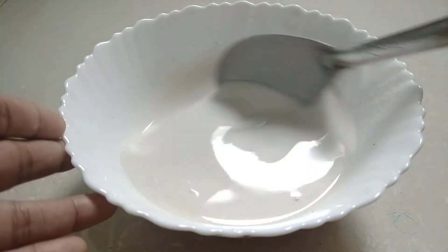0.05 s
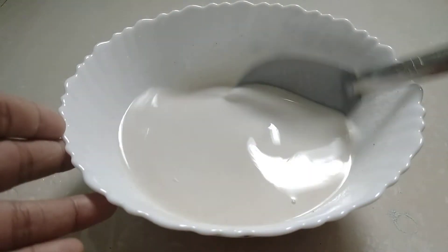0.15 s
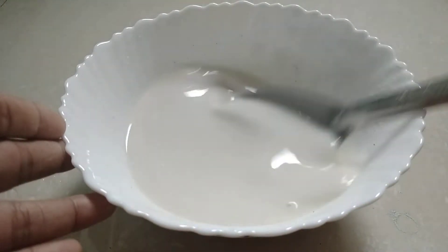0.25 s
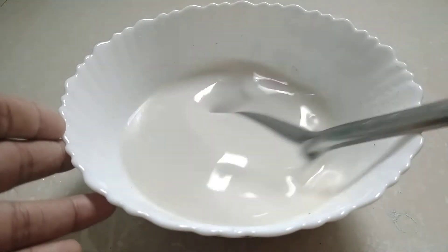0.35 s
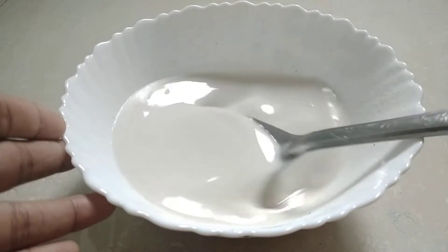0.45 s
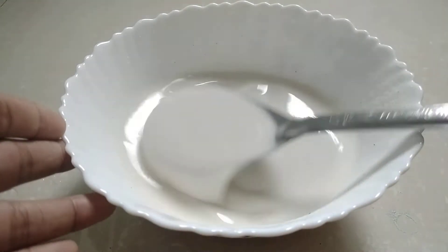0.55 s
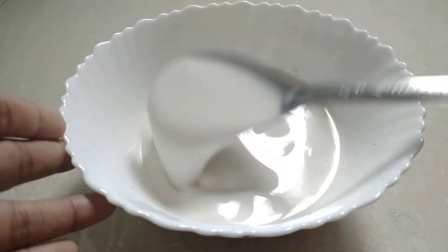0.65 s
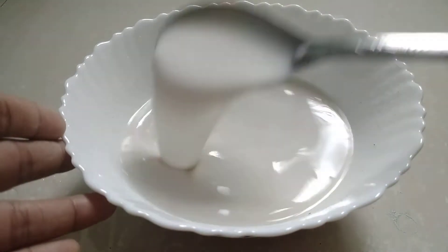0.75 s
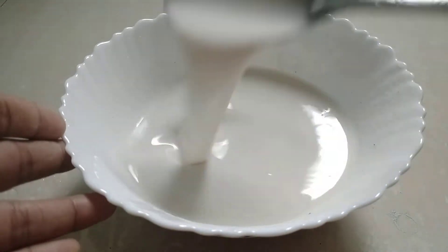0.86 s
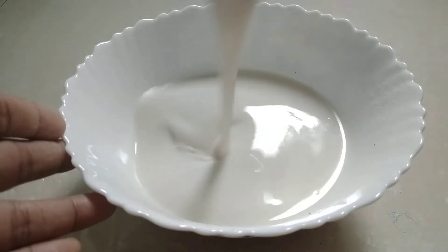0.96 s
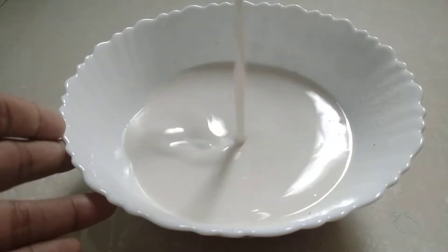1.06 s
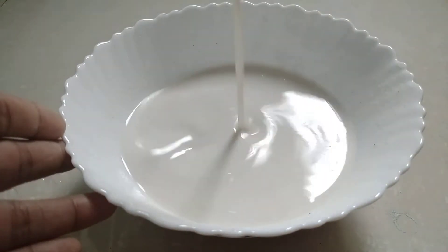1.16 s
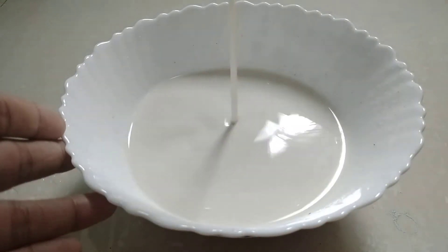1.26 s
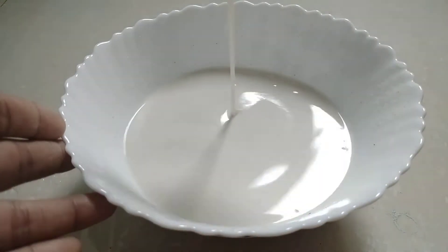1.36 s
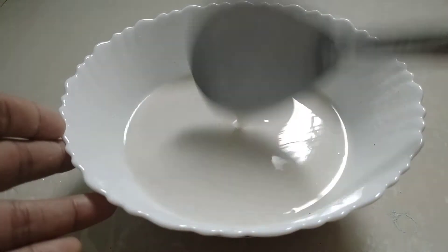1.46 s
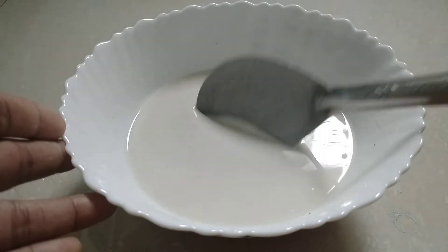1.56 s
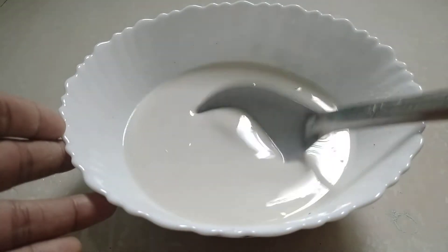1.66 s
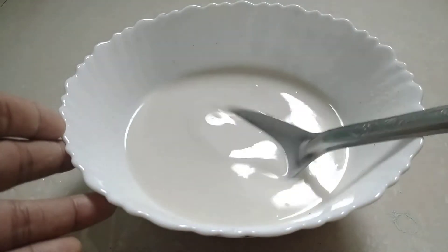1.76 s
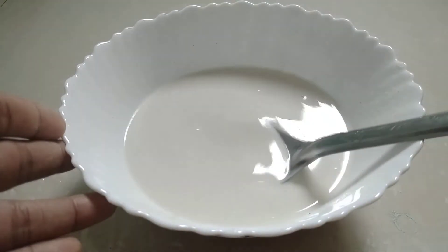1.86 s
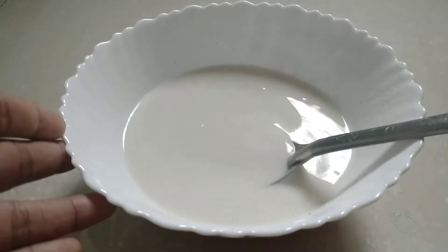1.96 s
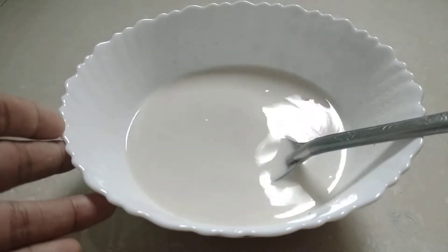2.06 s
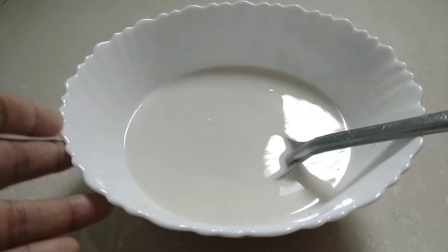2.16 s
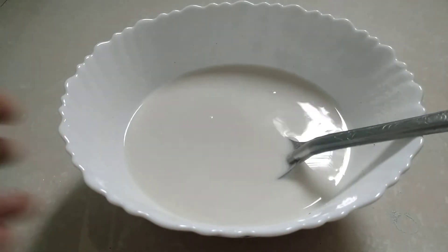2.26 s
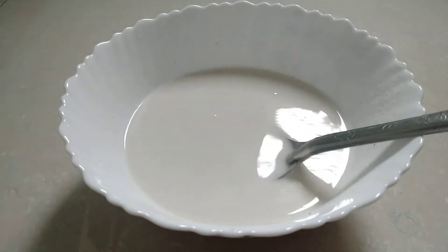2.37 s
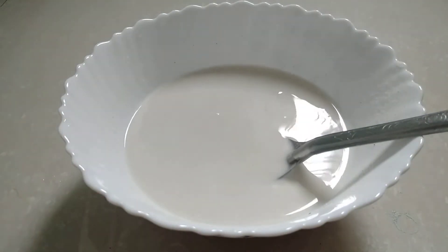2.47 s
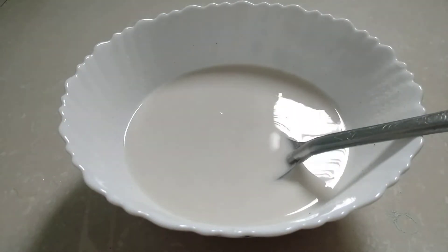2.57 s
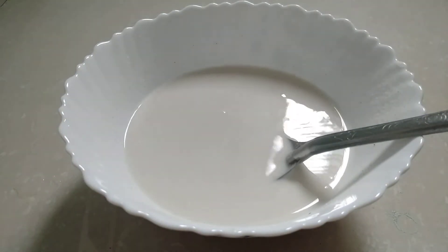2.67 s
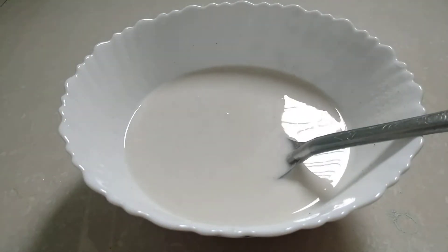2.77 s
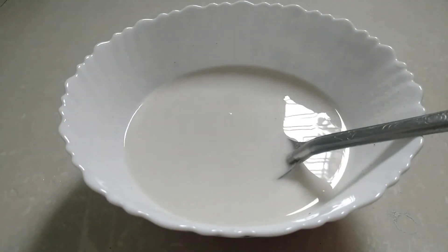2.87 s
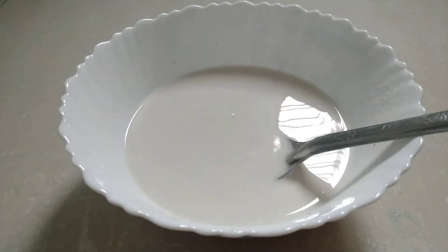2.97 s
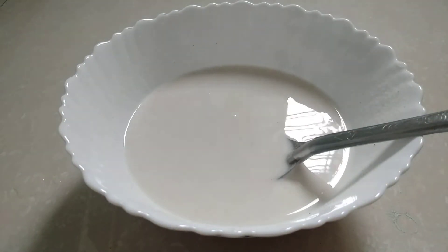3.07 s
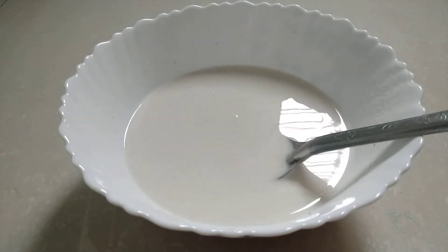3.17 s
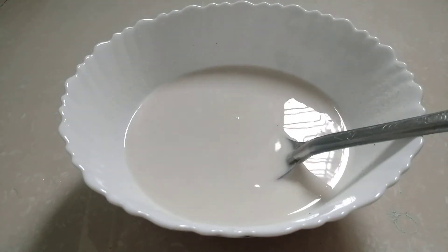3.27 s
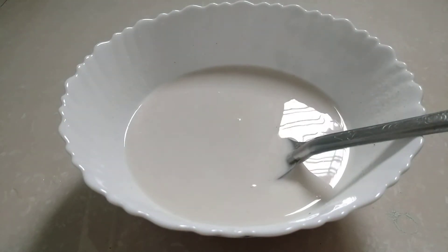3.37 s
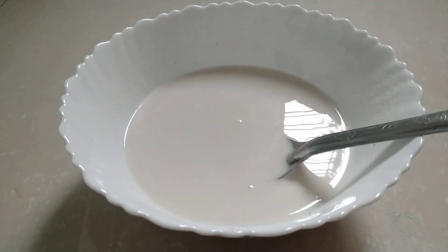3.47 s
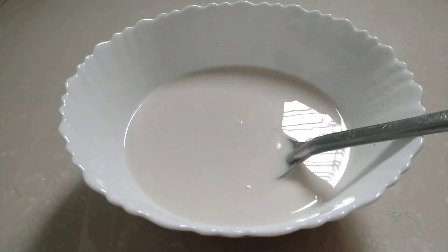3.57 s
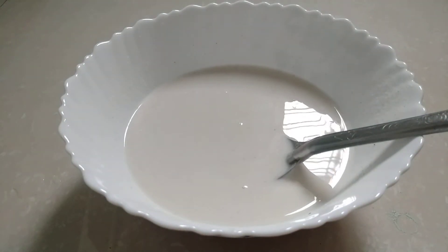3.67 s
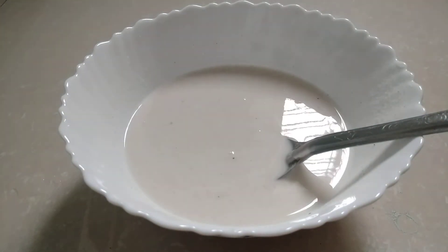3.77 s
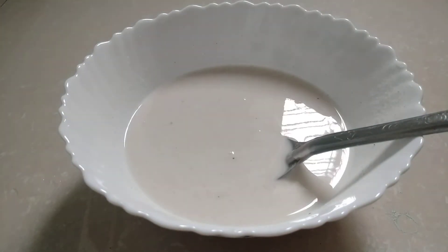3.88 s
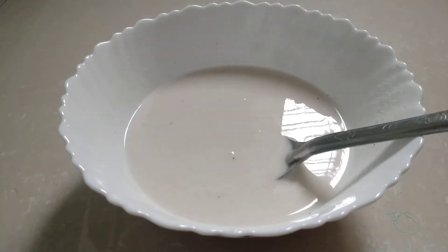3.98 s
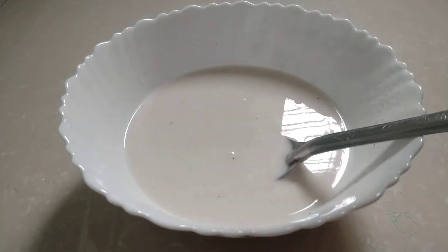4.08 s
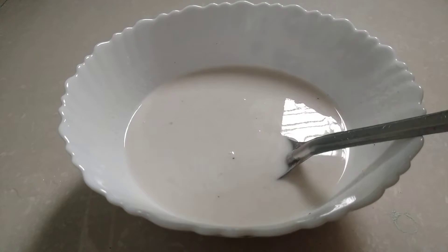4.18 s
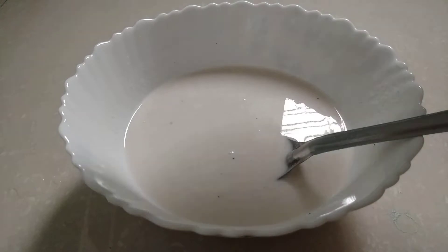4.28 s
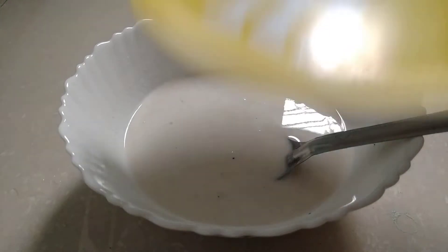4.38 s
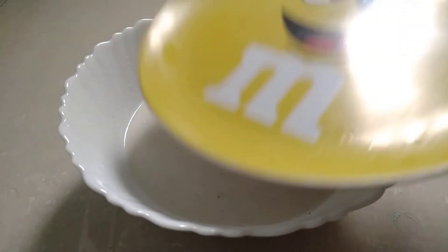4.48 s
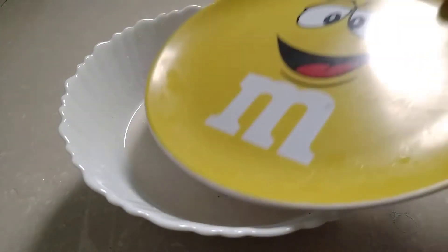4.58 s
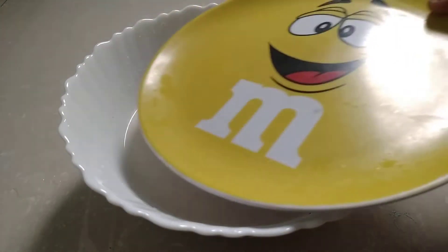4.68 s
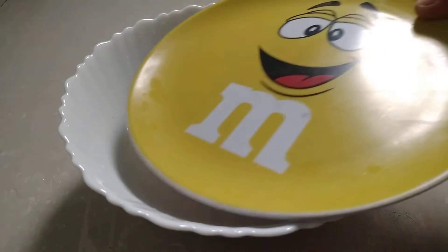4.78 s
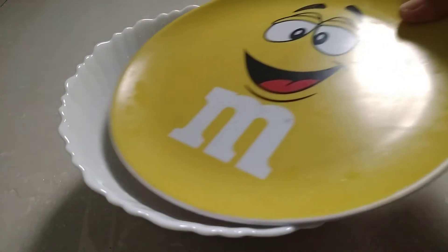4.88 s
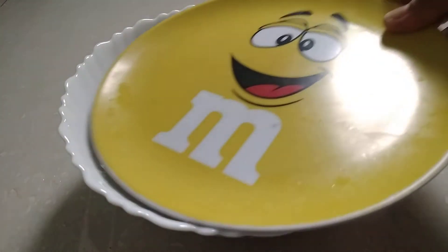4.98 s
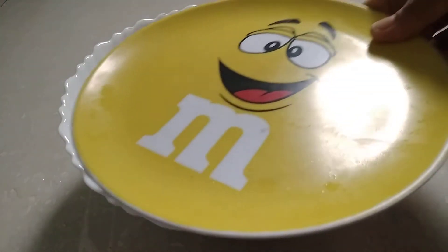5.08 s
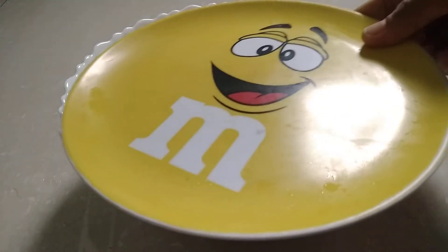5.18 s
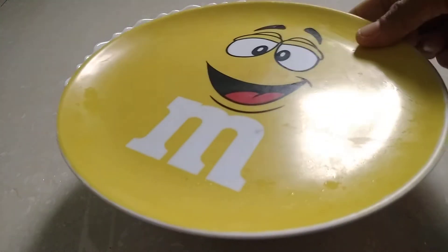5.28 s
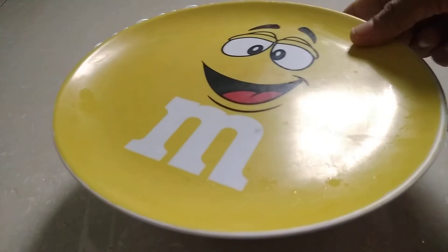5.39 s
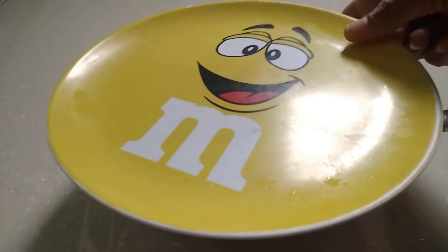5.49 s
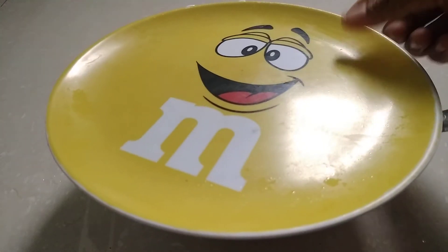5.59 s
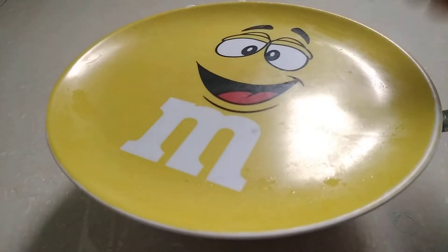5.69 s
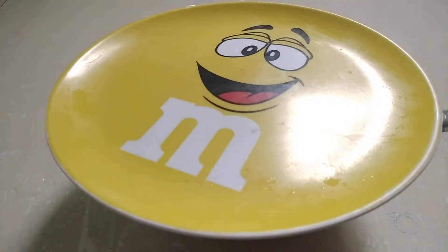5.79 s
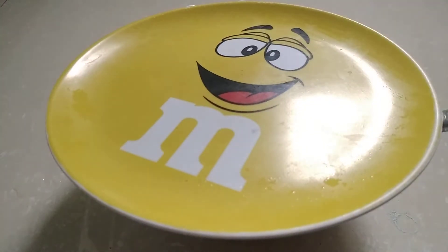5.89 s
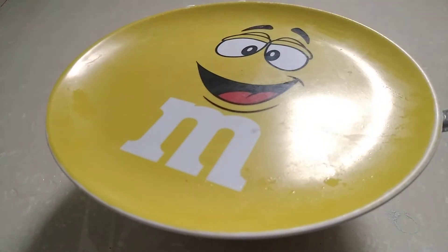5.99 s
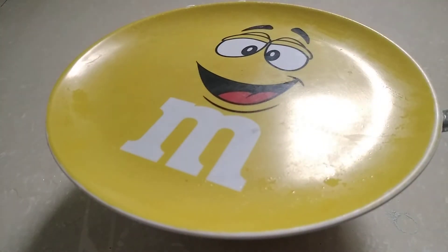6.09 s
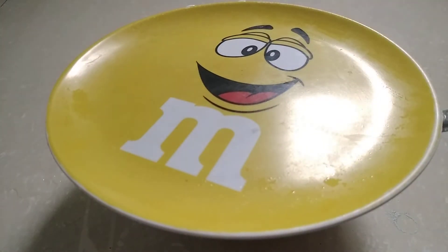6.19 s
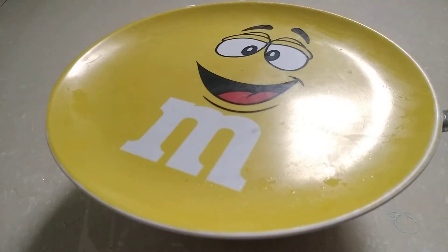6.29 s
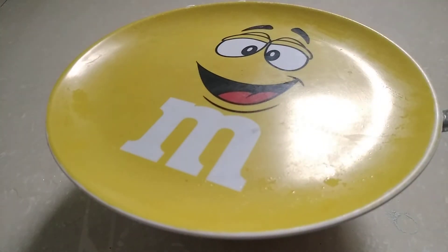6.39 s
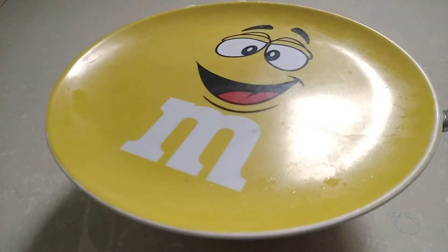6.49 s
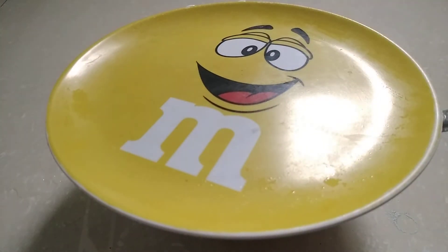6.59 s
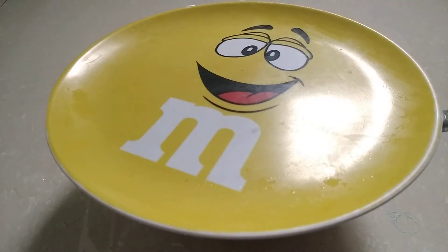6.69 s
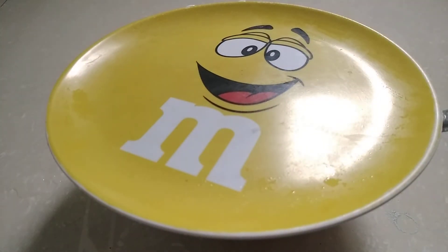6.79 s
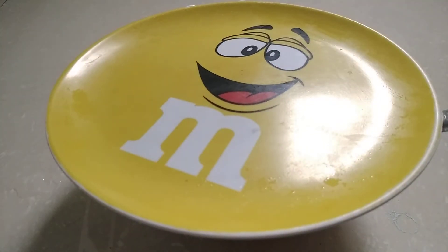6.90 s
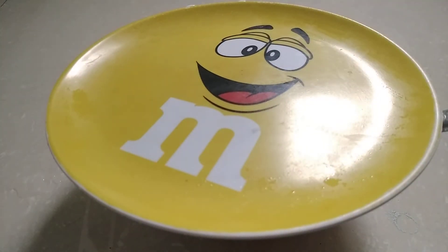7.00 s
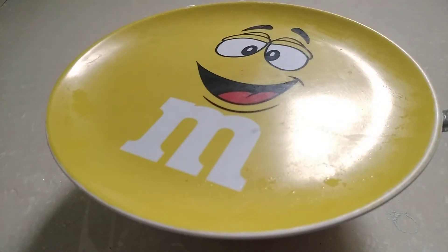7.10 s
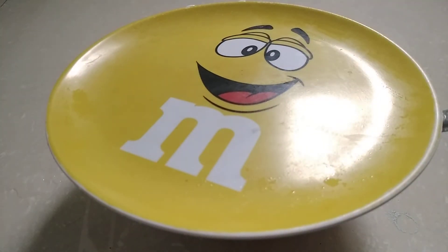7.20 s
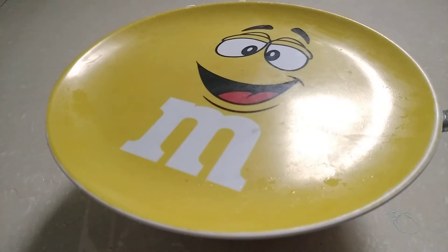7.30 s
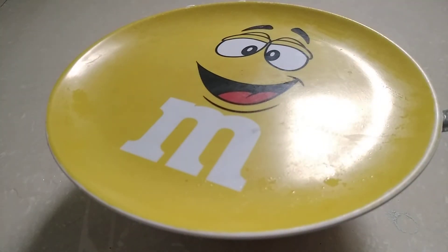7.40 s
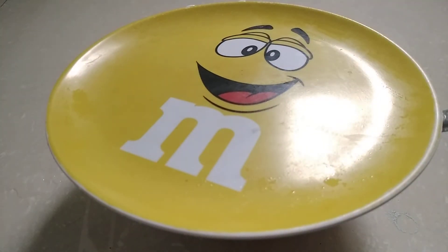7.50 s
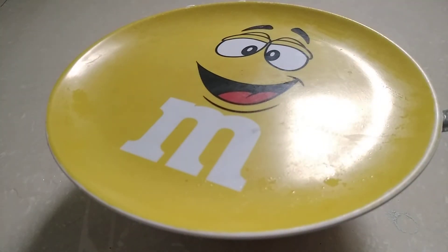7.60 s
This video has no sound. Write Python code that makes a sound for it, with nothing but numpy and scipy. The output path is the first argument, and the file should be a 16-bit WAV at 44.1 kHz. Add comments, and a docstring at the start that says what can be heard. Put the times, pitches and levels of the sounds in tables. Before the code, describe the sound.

For the first 0.4 seconds a steel spoon knocks and scrapes against a glass bowl of batter, with short, damped clinks. Two dry taps sound nearby at about 0.9 and 1.2 seconds. From 1.8 to 2.2 seconds the spoon is laid down in the bowl with a clink, a quick rattle and a light scrape. Bangles click sharply at 2.8 seconds and jingle until about 3.1, then tick again around 4.1. At 4.65 seconds a plastic plate lands on the rim with a loud, hollow knock. It slides across, rubbing and clattering, with a brief low thrum around 5.1 as the bowl drags on the counter, and rocks to rest by 5.6. Faint bangle ticks and a soft sleeve rustle follow until 6.4. Everything is close, in a quiet kitchen whose low hum and hiss continue to the end, near 7.6 seconds.

```python
"""A steel spoon knocks and scrapes a glass bowl of thin batter and is laid down. Dry taps sound nearby,
bangles tick on two moving wrists, and a plastic plate slides over the bowl as a lid and rocks to rest.
Each impact is a crack followed by the damped modes of the struck body; friction drives those modes
with noise. A quiet kitchen hums and hisses around a two-port microphone whose right port hears
little bass."""
import sys
import numpy as np
from scipy.fft import rfft, irfft, next_fast_len
from scipy.io import wavfile
from scipy.ndimage import map_coordinates

SR = 44100
rng = np.random.default_rng(int(sys.argv[2]) if len(sys.argv) > 2 else 0)


def wrap_up_sound(samples):
    """Save the sound to the file named by the first command line argument, as 16-bit audio."""
    columns = np.atleast_2d(samples).T
    # keep every value between -1 and 1, then stretch to whole-number steps
    tamed = np.clip(columns, -1, 1)
    steps = np.round(tamed * 32767).astype(np.int16)
    wavfile.write(sys.argv[1], SR, steps)


N = 337365
TIME, AGE = np.arange(N) / SR, np.arange(SR // 4) / SR  # seconds into the scene, into one impact

# Modes of the bowl and of the plate. Each row: frequency in Hz, level in dB, T60 in seconds.
BOWL_MODES = [(545, -17, 0.093), (625, -15.5, 0.17), (799.4, -10, 0.052), (876, -13.5, 0.16),
              (934, -14.5, 0.16), (1340, -13.5, 0.22), (1626, -4.5, 0.06), (1791, -14.5, 0.24),
              (2116, -13.5, 0.15), (2390, -6, 0.071), (2620, 4, 0.042), (2820, -2.5, 0.066),
              (2920, -1, 0.02), (3530, 1, 0.051), (3870, 3, 0.093), (4000, 9, 0.029), (4330, 2, 0.094),
              (4670, 8, 0.059), (5190, -1, 0.042), (5530, 0, .05), (5800, -4, 0.07), (6030, 0, 0.046),
              (6470, 3.5, 0.046), (7600, -2, 0.059), (7990, 1, 0.04), (8720, 5.5, 0.028),
              (9540, -6.5, 0.02), (9710, 9.5, 0.035), (10400, -5, .05), (11200, 2.5, 0.12),
              (12000, 2, 0.056), (12260, -15, 0.037), (13457, -18, .04)]
PLATE_MODES = [(337, -6.5, 0.15), (532, -4.5, 0.1), (587, -1.5, 0.1), (638, 3.5, 0.07), (714, -2, 0.031),
               (794, -5.5, 0.06), (881.5, -1, 0.12), (1040, -10, 0.13), (1166, 3.5, 0.11), (1382, -7, 0.1),
               (1483, -7.5, 0.17), (1585, -8, 0.14), (1681, -6, 0.15), (2125, -6, 0.13), (2378, -2, 0.16),
               (3225, -2, .12), (3536, 3, 0.12), (3688, 1, 0.12), (1891, -7, 0.061), (2010, -4.5, 0.087),
               (2600, -8, 0.019), (2980, -7, 0.06), (3800, 4, 0.035), (4290, 10.5, 0.055),
               (4450, -4, 0.062), (4560, 8, 0.048), (5210, -8, 0.11), (5500, -4, 0.027), (5700, -5, 0.07),
               (6570, 4, 0.045), (7270, -11, 0.064), (7470, 7, 0.022), (8880, 5.5, 0.099), (9620, 0, 0.074),
               (12220, -10, 0.045)]
# Likeness of diffuse sound at the two ports. Each row: frequency in Hz, correlation.
DIFFUSE = [(60, 1), (240, 0.55), (950, -0.025), (3770, 0.018), (15000, -0.059)]


def amp(db):
    """Amplitude ratio of a level in decibels."""
    return 10 ** (np.asarray(db) / 20)


def along(points, hz):
    """Interpolation of (Hz, value) points on a logarithmic frequency axis."""
    knots_hz, values = np.transpose(points)
    return np.interp(np.log(hz + 1), np.log(knots_hz + 1), values)


def wobble(rate):
    """Smooth random modulation with `rate` knots a second."""
    return map_coordinates(rng.standard_normal(int(N * rate / SR) + 4), [TIME * rate])


def swells(rows, rise_db_per_s):
    """Exponential rise, hold and decay. Each row: start and end in seconds, level in dB, fade in dB/s."""
    return sum(amp(db - rise_db_per_s * np.maximum(start - TIME, 0) - fade * np.maximum(TIME - end, 0))
               for start, end, db, fade in rows)


def filtered(x, response):
    """Linear filtering: the spectrum is multiplied by a frequency response."""
    size = next_fast_len(x.shape[-1] + 8192)
    return irfft(rfft(x, size) * response(np.fft.rfftfreq(size, 1 / SR)), size)[..., :x.shape[-1]]


def stereo_noise(spectrum, correlation=DIFFUSE):
    """Partly coherent noise: the sum and difference of a mid signal of unit rms and a side signal."""
    def shape(hz):
        angle = np.arccos(np.clip(along(correlation, hz), -1, 1)) / 2
        return amp(along(spectrum, hz)) * [np.cos(angle), np.sin(angle)]
    mid, side = filtered(rng.standard_normal((2, N)), shape)
    return np.array([mid + side, mid - side]) / np.std(mid)


def resonance(modes, blur, floor):
    """Superposition of resonators, each blur / T60 hertz wide, over a flat floor."""
    return lambda f: floor + sum(amp(db) * 1j * f * blur / t60 / (hz * hz - f * f + 1j * f * blur / t60)
                                 for hz, db, t60 in modes)


def friction(spectrum, modes, blur, grit_db, surge_db=2):
    """Forced vibration: noise with fast grit and slower surges drives a body's modes."""
    roughness = amp(grit_db * wobble(280) + surge_db * wobble(45))
    force = roughness * stereo_noise(spectrum, [(600, 1.0), (1500, 0.12)])
    sound = filtered(force, resonance(modes, blur, floor=0.1))
    return 1.4 * sound / np.sqrt(np.mean(sound ** 2) + 1e-20)


def ring(modes, stretch, lag_s):
    """Free vibration: damped, slightly unsteady sines that reach the left port lag_s later."""
    t = np.clip(AGE - np.array([[lag_s], [0]]), 0, 1)
    drift = 2e-6 * np.cumsum(rng.standard_normal(len(AGE)))
    out = 0
    for hz, db, t60 in modes:
        left_phase = rng.normal(0, min(hz / 3000, 1)) * np.array([[1], [0]])
        onset = 1 - np.exp(-t * hz / 0.57)  # a mode needs about a cycle to build up
        decay = amp(db + rng.normal(0, 2) - 60 * t / (t60 * stretch))
        out = out + onset * decay * np.sin(hz * (2 * np.pi * t + drift) + left_phase)
    return out


def burst(band, stretch, room_db, lag_samples, modes=()):
    """A coherent crack of band noise, then incoherent reverberation coloured by the modes."""
    low, high, crack_t60, room_t60 = band[:4]
    colour = resonance(modes, blur=4, floor=band[-1])

    def shape(hz):
        tint = (np.ones_like(hz) * colour(hz)) ** np.array([[0], [1], [1]])  # the crack stays flat
        return tint / (1 + (low / (hz + 1)) ** 6) / (1 + (hz / high) ** 6)
    noise = filtered(rng.standard_normal((3, len(AGE))), shape)
    noise /= noise.std(axis=1, keepdims=True)
    crack = noise[0] * amp(-60 * AGE / (crack_t60 * stretch)) * (1 - np.exp(-AGE / (0.091 * crack_t60)))
    room = noise[1:] * amp(room_db - 60 * AGE / room_t60) * (1 - np.exp(-AGE / 0.00027))
    return np.array([np.roll(crack, lag_samples), crack]) + room


def snap(width_s, lag_s, count):
    """Contact transient: `count` pressure spikes, spaced as quick, uneven rebounds."""
    gap_draw, level_draw = rng.standard_normal((2, 4))
    gaps_s = 0.0015 * amp(3 * gap_draw)
    starts = np.cumsum(gaps_s) - gaps_s[0]
    out = 0
    for k in range(count):
        u = np.clip(AGE - starts[k] - np.array([[lag_s], [0]]), 0, 1) / width_s
        out = out + amp(2 * level_draw[k] + k) * np.e * u * (2 - u) * np.exp(-u)
    return out


def add(out, sound, start_s, pan_db):
    """Panning by level difference: mixes a sound in with the left pan_db above the right."""
    i = round(start_s * SR)
    out[:, i:i + len(AGE)] += sound * amp([[pan_db / 2], [-pan_db / 2]])


def impacts(events, modes, ring_db, crack_db, room_db, snap_db, snap_s, favour_db, lean_db, pan, lag):
    """Impulse excitation: each contact cracks and rings the modes, most those its position favours."""
    # Each event: start in seconds, level in dB, body and edge in dB over it, three favoured
    # frequencies in Hz, decay time factor. The lag of the left port is in samples.
    # Bands of an impact. Each row: low and high limit in Hz, crack and room T60 in seconds,
    # share of favour_db, ringing in dB, flat part of the room's response.
    bands = [(450, 1100, .012, .27, 1, 0, .08), (1100, 3200, .012, .3, .8, 0, .15),
             (3200, 7000, .011, .24, .55, -6, .22), (7000, 13500, .012, .2, .5, -7, .35)]
    hard_db, clang_db_per_db = -34, 0.13  # harder blows ring their treble modes more
    out = np.zeros((2, N + SR))
    for start, db, body, edge, *favoured_hz, stretch in events:
        pan_db = np.interp(start, *np.transpose(pan))
        stretch = np.clip(stretch, 0.2, 4)
        for band, offset_db in zip(bands, (body, 0, edge + lean_db, edge - lean_db)):
            low, high, _, _, share, band_ring_db, _ = band
            in_band = [m for m in modes if (low <= m[0] or band is bands[0]) and m[0] < high]
            excited = []
            for hz, level, t60 in in_band:
                nearness = max(np.exp(-(np.log(hz / np.array(favoured_hz)) / 0.041) ** 2))
                detune = rng.normal(1, 0.003)  # the grip changes
                excited.append((hz * detune, level + share * favour_db * nearness, t60))
            clang_db = (low > 3000) * clang_db_per_db * (db + offset_db - hard_db)
            ringing = amp(ring_db + band_ring_db + clang_db) * ring(excited, stretch, lag / SR)
            crack = amp(crack_db) * burst(band, stretch, room_db, lag, excited)
            add(out, amp(db + offset_db) * (ringing + crack), start, pan_db)
        add(out, amp(db + edge / 2 + snap_db) * snap(snap_s, lag / SR, count=4), start, pan_db)
    return out[:, :N]


def noise_floor():
    """Broadband noise: room rumble and microphone hiss, each wavering slightly in level."""
    # Spectra of the two. Each row: frequency in Hz, relative density in dB.
    rumble_spectrum = [(15, -48), (25, -69.5), (38, -3.5), (124, -3), (151, 1.5), (320, -2), (425, -5),
                       (494, -5), (900, -11.5), (1170, -32.5), (1980, -120)]
    hiss_spectrum = [(290, -54.5), (500, -8), (655, -16), (811, -15.5), (935, -2), (1410, -5.5), (2290, -5),
                     (2680, -6), (3410, -6), (5010, -11), (5460, -15.5), (7790, -9), (8990, 3),
                     (11200, -14.5), (13900, -14.5), (15000, -29)]
    rumble = amp(-67.5 + 1.1 * wobble(6) + 0.7 * wobble(1)) * stereo_noise(rumble_spectrum)
    hiss = amp(-66.5 + 0.3 * wobble(8) + 0.5 * wobble(1)) * stereo_noise(hiss_spectrum)
    return rumble + hiss


def far_hums():
    """Low tones, modulated in amplitude and frequency, come and go like far engines."""
    # Each row: start and end in seconds, first and last frequency in Hz, relative level in dB.
    hums = [(0, 0.873, 89.4, 90.4, -71.5), (1.05, 1.417, 92.6, 91, -73), (1.083, 1.82, 135, 136.8, -74),
            (6.116, 7.245, 73.9, 89.8, -73.5), (7.046, 7.205, 282, 282, -67),
            (7.33, 7.651, 277, 285, -71.5)]
    out = 0
    for start, end, first_hz, last_hz, db in hums:
        envelope = swells([(start, end, db, 300)], 300) * amp(3 + 4 * wobble(8))
        hz = np.interp(TIME, [start, end], [first_hz, last_hz]) + 3.07 * wobble(23)
        out = out + envelope * np.sin(2 * np.pi * np.cumsum(hz) / SR)
    return out


def whine(start_s=4):
    """Closely spaced tones near 10 kHz beat inside a narrow band of hiss."""
    # The tones and the hiss spectrum. Each row: frequency in Hz, relative level in dB.
    partials = [(9905, -84), (10002, -84), (10104, -80), (10201, -88)]
    fizz_spectrum = [(9600, -40), (9800, 0), (10250, 0), (10450, -40)]
    tones = sum(amp(db + 3 + 2 * wobble(6))
                * np.sin(2 * np.pi * hz * TIME + [[0], [1.5]] + 0.6 * wobble(30)) for hz, db in partials)
    return (TIME > start_s) * (tones + amp(-72.5) * stereo_noise(fizz_spectrum))


def sleeve():
    """Friction of moving cloth gives swells of broadband noise."""
    # Each row: start and end in seconds, level in dB, fade in dB/s.
    moves = [(5.96, 6.0, -57, 65), (7.4, 7.65, -69.5, 90)]
    # Each row: frequency in Hz, relative density in dB.
    spectrum = [(240, -17), (400, 8), (677, -5), (787, 4.5), (1470, -2), (2040, 4), (5000, -4.5),
                (8000, -8.5), (10400, -4), (13500, -10), (17600, -120)]
    return swells(moves, 70) * amp(0.75 * wobble(36)) * stereo_noise(spectrum)


def board_taps():
    """Dry taps nearby: impacts excite the well-damped modes of a board."""
    # Each row is one tap, with the columns of an event in impacts().
    taps = [(0.595, -73.5, -7, 23, 620, 2170, 8700, 1), (0.826, -61, -27, -10, 950, 2480, 8700, 0.98),
            (0.865, -68.5, -18, 18, 956, 2110, 8700, 0.63),
            (0.936, -33, -16.5, 3.5, 2060, 2480, 12500, 0.78), (1.1757, -37, -8, 7, 1530, 2210, 4460, 0.85),
            (5.845, -57, -4.5, -12, 1500, 2200, 940, 0.28)]
    # Each row: frequency in Hz, level in dB, T60 in seconds.
    board_modes = [(940, 4.5, 0.17), (981, 9.5, 0.12), (1340, -48, 0.037), (1590, -4.5, 0.031),
                   (2130, -12, 0.13), (2210, -7, 0.057), (2530, -4.5, 0.039), (2560, -19, 0.14),
                   (2940, 6.5, 0.023), (3740, 12, 0.005), (4420, 5, 0.039), (6500, 10, 0.0052),
                   (8660, 6.5, 0.019), (12400, -8, 0.014)]
    return impacts(taps, board_modes, ring_db=-6.5, crack_db=4, room_db=-22.5, snap_db=-33, snap_s=5e-5,
                   favour_db=19.5, lean_db=-1, pan=[(0, -1.9)], lag=4)


def bangle_slither():
    """Sliding friction on skin drives the modes of the bangles."""
    # Each row: start and end in seconds, relative level in dB, fade in dB/s.
    slides = [(2.76, 2.92, -58, 71), (2.99, 3.05, -86, 122), (4.13, 4.14, -55.5, 59.6),
              (6.06, 6.2, -64, 59.4)]
    # Friction spectrum. Each row: frequency in Hz, relative density in dB.
    spectrum = [(500, -44), (900, -9.5), (1500, -17), (2710, -20.5), (4010, -13.5), (4380, -6),
                (5730, -13.5), (7500, -15.5), (9750, -16), (13500, -10), (16500, -120)]
    # Each row: frequency in Hz, level in dB, T60 in seconds.
    hoop_modes = [(2280, -2.5, .08), (2700, 3, 0.0657), (3619, -6.5, 0.043), (6150, -1.5, .1),
                  (8000, 3.5, .06)]
    return swells(slides, 2000) * friction(spectrum, hoop_modes, blur=14, grit_db=2.5)


def bangle_ticks():
    """Thin hoops collide: a sharp click, then the free vibration of a large and a small hoop."""
    # Each row: start in seconds, level in dB, relative levels of the dull click, the large hoop
    # and the small hoop in dB, decay time factor.
    touches = [(1.5443, -61.5, 7, -35, -0.5, 0.87), (2.3428, -54.5, 7.5, -50, -13, .7),
               (2.377, -61, -8, -44, -21, 0.7), (2.7567, -34, 4.5, -32, -40, 1),
               (2.758, -21.5, -11, -32, -50, 1), (2.7614, -25.5, -12.5, -35, -50, 1),
               (2.8131, -47, -6, 11, -30, 2.2), (2.828, -45, -12, -1, -30, 2),
               (2.835, -32, -10, -6.5, -30, 1.4), (2.85, -42, -6, 1, -28, 2.9),
               (2.897, -50, -15, -2, -30, 1), (2.9268, -48.5, -8, -1, -30, 1.1),
               (2.997, -38.5, -6, -20, -40, 1), (3.009, -32, -4, -6, -37, 0.92),
               (3.031, -46, 6, -2, -30, .9), (3.0502, -45, -8, -22, -40, 1),
               (3.0673, -40.5, -5, -23, -40, 1), (3.127, -56, -2, 3.5, -30, 1.5),
               (3.406, -53, -15, -0.5, -28, 1.2), (4.129, -35, -8, -10, -12, 1.1),
               (4.1312, -40, -18, 0, -16, 2.4), (4.1535, -44.5, -8, -40, -29, .5),
               (4.162, -50, -14, -40, -20, .6), (4.173, -45.5, 0, -40, -22, 0.88),
               (4.23, -64, -10, -30, 8, 1.1), (4.2474, -52, 0, -30, 12, 1.2),
               (5.783, -58.5, 4, -40, -18, 1), (5.79, -59, -8, -36, -24, 1),
               (5.8172, -55, 4, -41, -17, 1.1), (5.875, -49, -15, -48, 0, 1),
               (6.061, -44.5, 0, -40, -2, 0.36), (6.1608, -60, 8, -38, 3, 1.5),
               (6.177, -52, 8.5, -45.5, -32, 1), (6.3155, -54.5, 3, -39, 1, 1.4),
               (6.353, -56, 1, -53, 0, 0.9), (6.3832, -58, -12, -39.5, -2, 1.2)]
    # Hoop modes. Each row: frequency in Hz, level in dB, T60 in seconds.
    large_modes = [(7830, -11, 0.03), (7925, 4, 0.041), (6150, -32, 0.15)]
    small_modes = [(11800, 5.5, 0.055), (11700, -3, 0.18), (9530, 0.5, 0.067), (6200, -13, 0.082),
                   (5000, -20, 0.063)]
    # Place of the moving wrist. Each row: time in seconds, left over right in dB.
    wrist_pan = [(2.4, 12.5), (2.7, -11), (2.93, -4.5), (3.0, -2.5), (3.45, -1), (4.1, 9)]
    out = np.zeros((2, N + SR))
    for start, db, dull_db, large_db, small_db, stretch in touches:
        dull = amp(dull_db + 9.5) * burst((2640, 7000, 0.0032, 0.05), 0.51, -20.5, lag_samples=8.1)
        bright = amp(16) * burst((9300, 10200, 0.0054, 0.11), 1, -28, lag_samples=3)
        spike = amp(-5.7) * snap(3.2e-5, lag_s=0.00017, count=1)
        large = amp(large_db) * ring(large_modes, stretch, lag_s=0.000235)
        small = amp(small_db) * ring(small_modes, stretch, lag_s=0.000258)
        pan_db = np.interp(start, *np.transpose(wrist_pan)) + rng.normal(0, 2)
        add(out, amp(db) * (dull + bright + spike + large + small), start, pan_db)
    return out[:, :N]


def bowl_drag():
    """Friction on the counter gives a low thrum as the bowl drags under the plate."""
    # Each row: start and end in seconds, level in dB, fade in dB/s.
    drags = [(5.03, 5.21, -55.5, 196)]
    # Each row: frequency in Hz, relative density in dB.
    spectrum = [(35, -40), (60, -4), (220, 2), (254, 2), (344, 11), (450, -7), (580, -35), (990, -120)]
    return swells(drags, 650) * stereo_noise(spectrum)


def plate_slide():
    """Friction on the rim drives the plate's modes: a hollow rub, and a hiss that swings less."""
    # Pressure of the plate on the rim. Each row: time in seconds, relative level in dB.
    pressure = [(4.7, -54), (4.824, -61.5), (4.896, -50), (5.032, -64), (5.116, -49.5), (5.216, -63.5),
                (5.296, -64.5), (5.72, -82)]
    # Each row: frequency in Hz, relative density in dB.
    hiss_spectrum = [(590, -32.5), (1000, -19), (1440, -5.5), (2390, -3.5), (4460, -9.5), (5990, -16),
                     (9010, -2.5), (15000, -13)]
    hollow_spectrum = [(250, -20), (450, 0), (800, 0), (1200, -25)]
    times, levels = np.transpose(pressure)
    gate = np.clip(np.minimum(TIME - times[0], times[-1] - TIME) / 0.0066, 0, 1)
    press = gate * amp(np.interp(TIME, times, levels))
    hiss_gain = amp(-59) * (press / amp(-59)) ** 0.67
    hiss = hiss_gain * friction(hiss_spectrum, PLATE_MODES, blur=24, grit_db=2)
    hollow = press * friction(hollow_spectrum, PLATE_MODES, blur=8, grit_db=1.5)
    return hiss + hollow


def plate_shiver(start_s=5.168, end_s=5.24):
    """The plate vibrates briefly at two low frequencies as it seats."""
    # Each row: frequency in Hz, level in dB.
    partials = [(120, -53), (350, -49.5)]
    gate = np.clip(np.minimum(TIME - start_s, end_s - TIME) / 0.012, 0, 1)
    return gate * sum(amp(db) * np.sin(2 * np.pi * hz * TIME) for hz, db in partials)


def plate_knocks():
    """Impacts on the rim excite the air cavity under the plate and the plate's flexural modes."""
    # Each row: start in seconds, thud in dB, click in dB over the thud, edge in dB over the click,
    # cavity note in Hz, favoured upper mode in Hz, decay time factor.
    contacts = [(4.6512, -40, 8, -6, 810, 3730, 0.59), (4.6531, -17.5, -3.5, 0, 797, 3710, 0.74),
                (4.686, -29.5, -1, -4.5, 786, 3690, 0.75), (4.764, -37.5, 3.5, -5, 615, 3600, 0.43),
                (4.798, -46, -16, 10, 654, 2030, 0.77), (4.82, -41.5, -8.5, 2.5, 704, 1010, 0.93),
                (4.882, -33.5, -13.5, 1, 705, 2500, 1.3), (4.903, -39.5, 1, -2, 626, 4700, 0.72),
                (4.943, -40, -1.5, 12, 650, 5500, 0.64), (4.946, -46, -12, -3, 642, 2010, 1.65),
                (4.955, -56, 14, -3, 614, 3100, 0.16), (5.016, -47, -14, 6, 703, 2030, 3.7),
                (5.025, -44, -2, -0.5, 633, 1000, 0.67), (5.043, -56.5, 16.5, 0, 640, 2030, 0.28),
                (5.0525, -47.5, -9, 5, 640, 3000, 1.5), (5.057, -42.5, -11, 4, 634, 3000, 0.76),
                (5.101, -37, -0.8, 5.5, 593, 4260, 0.42), (5.123, -46, -25, -4, 622, 2030, 1),
                (5.138, -49.5, 4, 12, 594, 5300, 0.42), (5.143, -36.5, -30, -4, 528, 2030, 0.82),
                (5.17, -44.5, -17, 9, 530, 2030, 1.2), (5.227, -67, 14, 5, 732, 2800, 0.91),
                (5.242, -49.5, -27, -4, 584, 2030, 2.3), (5.375, -40, -28, 18, 524, 3530, 0.56),
                (5.46, -49, -13, 2, 613, 3530, 1.15), (5.507, -50, -29, 3, 617, 3530, 0.51),
                (5.534, -50, -3, 3, 572, 2180, 1.1), (5.545, -37, -8, 6, 521, 2180, 0.78),
                (5.578, -37.5, -38, 1, 520, 2180, 0.46), (5.604, -43.5, -37, -1, 610, 2180, 0.71)]
    flex_hz, sag_hz_per_s = 1618, 290  # the favoured note sinks as the plate covers the bowl
    events = []
    for start, thud, click, edge, cavity_hz, upper_hz, stretch in contacts:
        note_hz = flex_hz - sag_hz_per_s * (start - contacts[0][0])
        events.append((start, thud + click, -click, edge, cavity_hz, note_hz, upper_hz, stretch))
    return impacts(events, PLATE_MODES, ring_db=-5, crack_db=6.5, room_db=-21.5, snap_db=6.5,
                   snap_s=4.5e-5, favour_db=18, lean_db=1.5, pan=[(0, -0.2983)], lag=5.49)


def spoon_scrape():
    """Friction of the spoon's edge on glass drives the modes of the bowl."""
    # Each row: start and end in seconds, relative level in dB, fade in dB/s.
    strokes = [(0, .18, -60, 397), (.215, .25, -45, 132), (1.978, 2.028, -60, 695),
               (2.04, 2.15, -61.5, 150)]
    # Friction spectrum. Each row: frequency in Hz, relative density in dB.
    spectrum = [(240, -45), (400, -5), (3340, 7), (4600, 3), (7030, 15), (7700, 15), (8820, 11), (9660, 7),
                (14300, 6), (15000, -27)]
    return swells(strokes, 700) * friction(spectrum, BOWL_MODES, blur=6, grit_db=3)


def spoon_knocks():
    """Impacts of steel on glass set the bowl into damped free vibration."""
    # Each row is one knock, with the columns of an event in impacts().
    knocks = [(0.047, -74, -2, 13, 2800, 6430, 9000, 1.4), (0.135, -57.5, -20, -4, 2880, 4770, 9000, .84),
              (0.1, -53.5, -18, 9.5, 525, 4600, 9000, 0.21),
              (0.1898, -27, -3.5, 4.5, 2390, 2805, 4040, 0.55),
              (0.205, -35.5, 7.5, -14, 788, 1560, 2790, 0.74), (0.267, -48.5, 19, 7, 823, 1585, 2790, 1.1),
              (0.292, -62.5, 0, 21, 850, 7970, 9200, 0.87), (0.3065, -32.5, 4, 2.5, 2450, 8730, 6240, 0.48),
              (0.331, -52, -2, 12.5, 1800, 3870, 9250, 1.73),
              (0.397, -61.5, 10.5, 13, 940, 1800, 2790, 0.55),
              (1.801, -39.5, 2.5, 4.5, 538, 9560, 5070, 0.48), (1.833, -74, 13, 24, 920, 11700, 6500, 0.74),
              (1.901, -59.5, -2, 9, 620, 1340, 9100, 0.89), (1.917, -51.5, 6.5, 4.5, 634, 2140, 9100, 0.6),
              (1.973, -44.5, 5.5, 6.5, 764, 2870, 5770, 1.6), (1.979, -44, -2, 9, 1325, 2790, 6500, 0.49),
              (1.987, -37.5, 1, 9, 550, 2630, 5400, 0.46), (1.992, -49, -1, 10, 1340, 2610, 4600, 1.1),
              (1.998, -44, -6, -1, 550, 2790, 4300, 0.56), (2.004, -50, -1, 10, 890, 2610, 5070, 1.1),
              (2.009, -45.5, -9, 8, 550, 2950, 4600, 0.77), (2.015, -47, 0, 10.5, 636, 2190, 6500, 1.3),
              (2.02, -53, 4.5, -3, 550, 2740, 5070, 2.9), (2.027, -50, -10, -2, 900, 1787, 4600, 1.3),
              (2.113, -48, 3.5, 6, 1310, 9530, 5070, 1.1), (2.188, -57, -1.5, 3, 920, 2790, 5900, 1.16),
              (2.3435, -57.5, -10, -4, 1390, 2100, 2390, 0.36)]
    return impacts(knocks, BOWL_MODES, ring_db=-1.24, crack_db=4.5, room_db=-19, snap_db=0, snap_s=4e-5,
                   favour_db=19.5, lean_db=-2.5, pan=[(0, 1.5)], lag=6.02)


def scene():
    """Superposition of knocks, rubbing and background; the knocks carry little sound below about 300 Hz."""
    knocks = spoon_knocks() + board_taps() + plate_knocks() + bangle_ticks()
    radiated = filtered(knocks, lambda hz: (1j * hz / 300 / (1 + 1j * hz / 300)) ** 3)
    rubbing = spoon_scrape() + plate_slide() + bangle_slither() + sleeve() + bowl_drag()
    return radiated + rubbing + plate_shiver() + noise_floor() + far_hums() + whine()


def record(dry):
    """Frequency response of the microphone: both ports are band-limited, the right short of bass."""
    # Each row: frequency in Hz, left over right in dB.
    imbalance = [(60, 13.5), (200, 15.5), (380, 10.5), (700, 0), (4400, 0), (9000, 3)]
    # Each row: frequency in Hz, gain of both ports in dB.
    roll_off = [(24, -30), (48, -2), (14100, -2.5), (14500, -47), (15600, -28)]
    top_hz = 15617

    def response(hz):
        right = amp(-along(imbalance, hz))
        ports = np.array([np.ones_like(hz), right]) * 2 / (1 + right)
        return ports * amp(along(roll_off, hz)) * (hz < top_hz)
    return filtered(dry, response)


dry = scene()
out = record(dry)
wrap_up_sound(out)
```